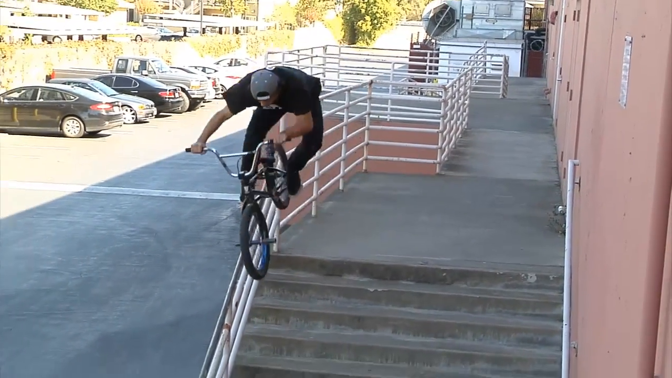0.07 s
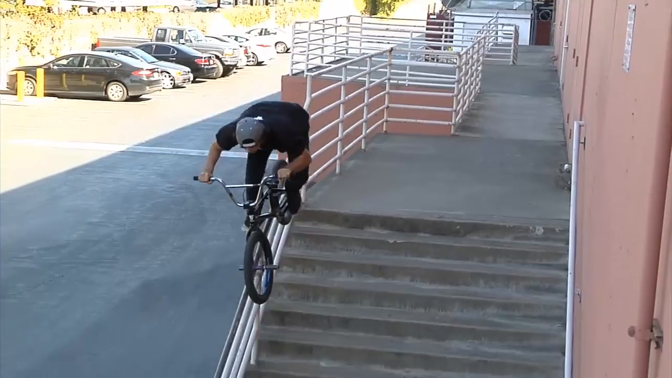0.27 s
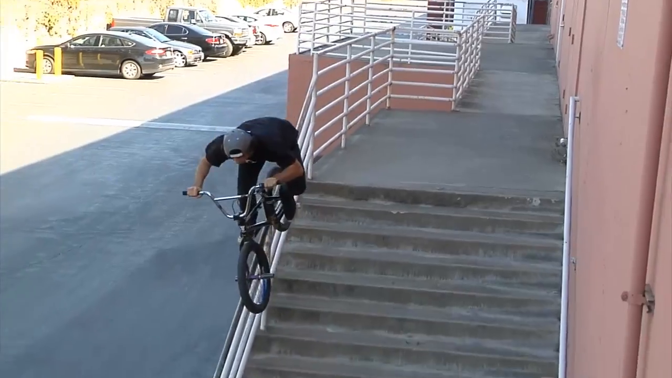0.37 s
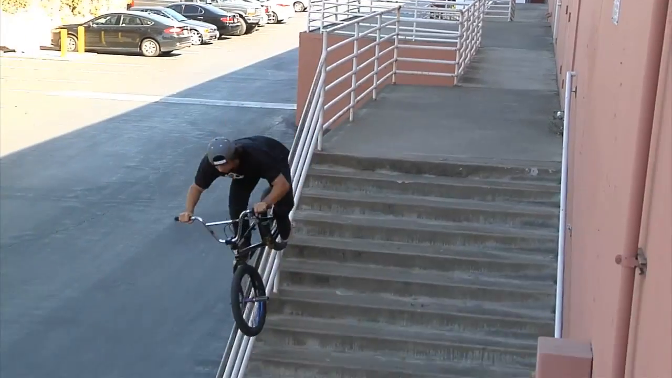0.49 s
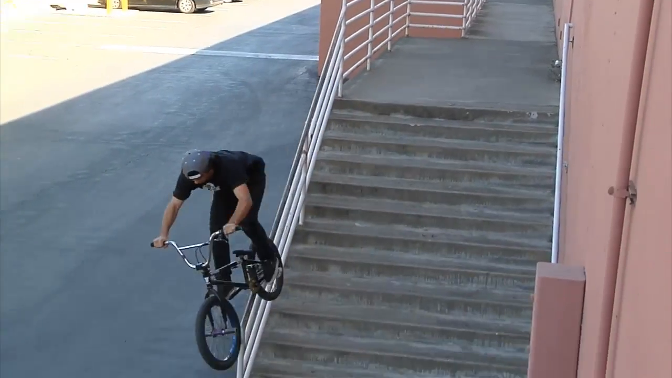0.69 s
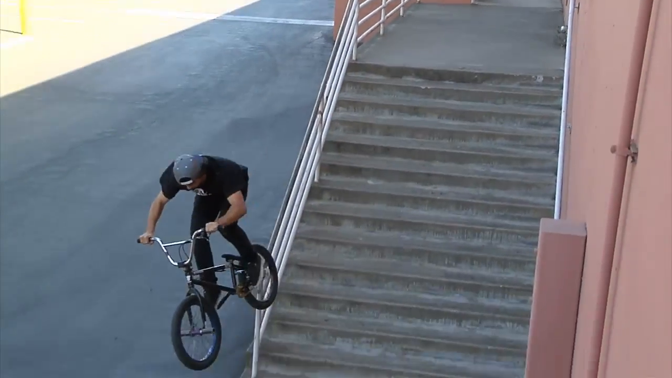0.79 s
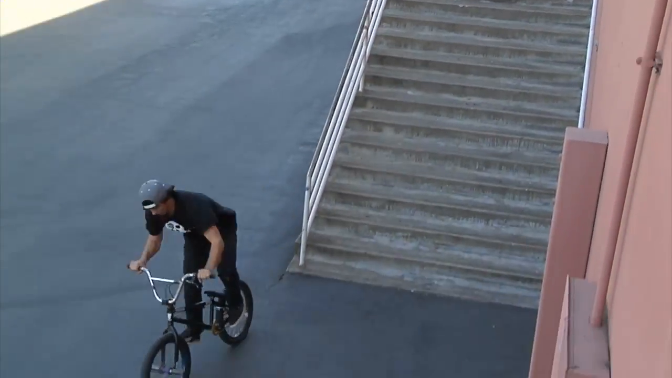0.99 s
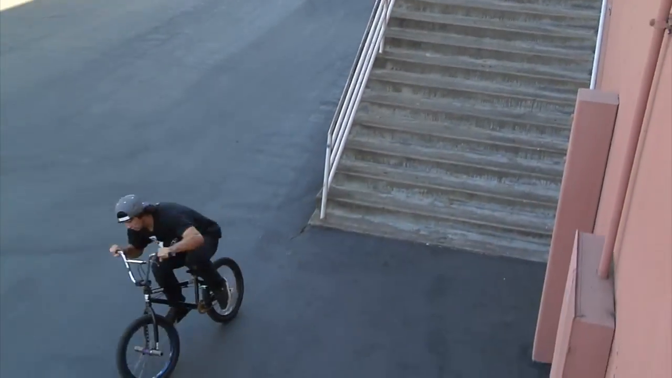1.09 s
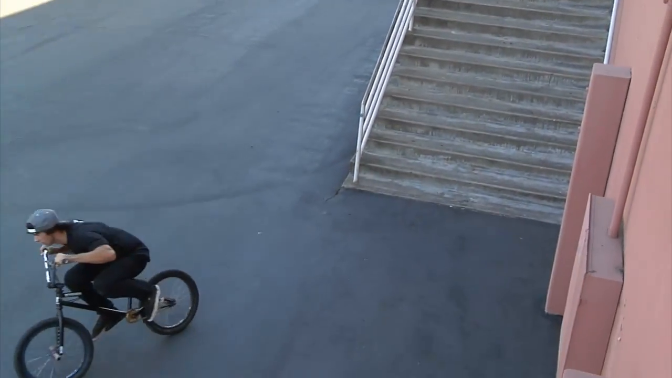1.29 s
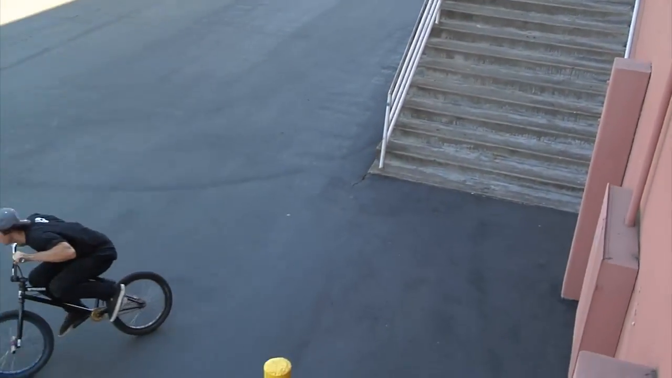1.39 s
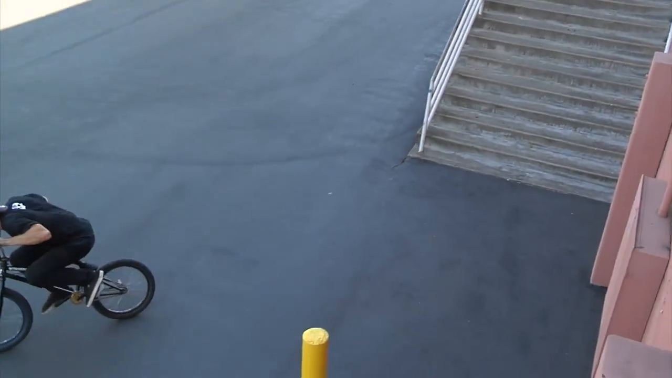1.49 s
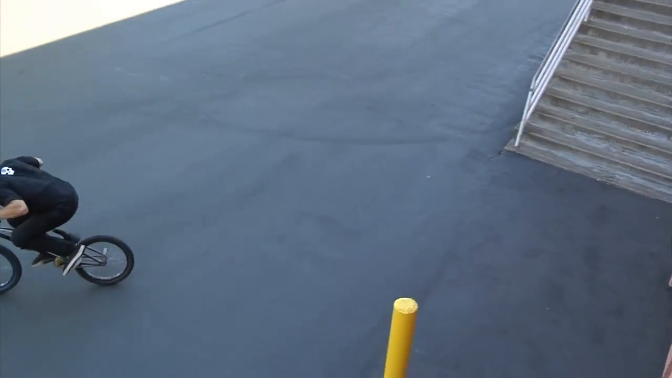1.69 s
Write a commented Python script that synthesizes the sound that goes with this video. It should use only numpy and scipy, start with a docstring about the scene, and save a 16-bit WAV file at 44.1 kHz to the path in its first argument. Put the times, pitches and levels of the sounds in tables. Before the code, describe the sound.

Ringing metal grind of a bicycle sliding down a stair rail, landing and rolling away.

```python
"""A bike's steel pegs slam onto a stair handrail, grind down it and clack off the end.
Stick-slip friction and knocks drive the rail's modes; the railing booms and rings on.
The tyres thump onto asphalt, chain and frame rattle, and the freewheel whirrs as the bike
rolls off. Walls reverberate; a low town hum lies underneath."""
import sys
import numpy as np
from scipy import signal
from scipy.fft import rfft, irfft
from scipy.io import wavfile
from scipy.ndimage import uniform_filter1d

SR = 44100
rng = np.random.default_rng(int(sys.argv[2]) if len(sys.argv) > 2 else 0)


def transcribe(u):
    """Save the signal u as a 16-bit wav file named by the first command-line argument.

    u: samples, shape (n,) or (channels, n), limited to [-1, 1]; the rate is SR.
    q: integer samples, one column per channel.
    """
    v = np.clip(np.atleast_2d(u).T, -1, 1)
    q = np.round(v * 32767).astype(np.int16)
    wavfile.write(sys.argv[1], SR, q)


N = 74970
T = np.arange(N) / SR
STEEL_RISE_S = 0.0004


def undb(db):
    return 10 ** (np.asarray(db) / 20)


def unit_rms(x):
    return x / np.sqrt(np.mean(x ** 2))


def butter(x, hz, kind, order=2):
    return signal.sosfilt(signal.butter(order, hz, kind, fs=SR, output="sos"), x)


def colour(x, spectrum):
    """Unit-energy minimum-phase filter from rows of freq_hz, gain_db."""
    freq_hz, gain_db = np.array(spectrum).T
    bins_hz = np.maximum(np.arange(2049) * SR / 4096, 1)
    cepstrum = irfft(np.interp(np.log(bins_hz), np.log(freq_hz), gain_db) * np.log(10) / 20)
    cepstrum[1:2048] *= 2
    cepstrum[2049:] = 0
    impulse = irfft(np.exp(rfft(cepstrum)))
    return signal.fftconvolve(x, impulse / np.sqrt(np.sum(impulse ** 2)))[:N]


def envelope(table, column):
    """Gain over time from a dB column, silent outside the table."""
    rows = np.array(table)
    return undb(np.interp(T, rows[:, 0], rows[:, column], left=-120, right=-120))


def wander(rate_hz):
    """Random steps at rate_hz, smoothed twice."""
    hold = int(SR / rate_hz)
    steps = np.repeat(rng.standard_normal(N // hold + 1), hold)
    return 1.143 * uniform_filter1d(uniform_filter1d(steps, hold), hold)[:N]


def stick_slip(slips_per_s=4000, spread_db=2):
    """Dense uneven friction clicks over a rubbing hiss."""
    slipping = rng.random(N) < slips_per_s / SR
    clicks = slipping * rng.standard_normal(N)
    clicks *= undb(spread_db * np.minimum(rng.exponential(size=N), 3.5))
    return unit_rms(unit_rms(clicks) + undb(-0.5) * rng.standard_normal(N))


def decay(start_s, level_db, t60_s, rise_s):
    """Impact envelope: fast rise, exponential fall."""
    age_s = np.maximum(T - start_s, 0)
    return undb(level_db - 60 * age_s / t60_s) * (1 - np.exp(-age_s / rise_s))


def struck_mode(hits, pitch_hz, t60_s, rise_s=STEEL_RISE_S):
    """One damped sine per hit."""
    return sum(decay(start_s, level_db, t60_s, rise_s) * np.sin(2 * np.pi * pitch_hz * (T - start_s))
               for start_s, level_db in hits)


def town_hum(level_db=-38):
    """Low town noise, drifting slightly in level."""
    # freq_hz, gain_db
    spectrum = [(30, -3.5), (90, -1), (250, -9.5), (400, -12), (649, -18), (1760, -34.5), (2290, -37.5),
                (16000, -60)]
    return unit_rms(colour(rng.standard_normal(N), spectrum)) * undb(level_db + 0.84 * wander(8.6))


def freewheel():
    """Freewheel and chain whirr: faint in the air, louder rolling away."""
    # time_s, level_db
    levels = [(0, -58.5), (1.09, -59), (1.106, -48.5), (1.282, -52.5), (1.45, -49.5), (1.7, -47.5)]
    # freq_hz, gain_db
    spectrum = [(710, -22), (1570, -25), (2130, -2), (3150, -2), (3380, 6), (3750, -4), (5070, -7),
                (7000, -4), (7730, -0.5), (8630, -9.5), (10100, -7), (11500, -14.5), (13100, -9),
                (16000, -14)]
    return undb(-2) * colour(stick_slip() * envelope(levels, 1) * undb(1.1 * wander(37.54)), spectrum)


def metal_knocks(landing_s=1.03):
    """Noisy blows of pegs, chain and frame. Returns their sound and their push on the rail until landing."""
    # start_s, level_db, bass_offset_db, treble_offset_db, t60_s
    knocks = [(0.2161, -25, -4, -25, 0.037), (0.2200, -20, -16, 8, 0.069), (0.2249, -16, -6, 7, 0.086),
              (.256, -19, -4, 10.5, 0.24), (0.412, -27.5, 10, 9, 0.044), (0.677, -28, -18, 20.5, 0.065),
              (0.862, -19.5, -16, 2.5, 0.11), (1.036, -13, -14, -15, 0.04), (1.0437, -11, -27, -17, 0.022),
              (1.049, -15.5, -14, 9.5, 0.093), (1.058, -23, -12, -18, 0.068), (1.073, -33, -13, 26, 0.034),
              (1.0944, -25, -25, 13, 0.071), (1.1392, -26, -1, 7, 0.19), (1.1735, -22.5, 1, 11, 0.026)]
    # freq_hz, gain_db
    spectrum = [(120, -31), (200, 9), (353, -4), (1400, -21.5), (1560, -17.5), (2290, -25), (3430, -23.5),
                (4350, -31), (7540, -27), (16000, -56.5)]
    gains = np.zeros((3, N))
    for start_s, level_db, bass_db, treble_db, t60_s in knocks:
        gains += decay(start_s, level_db, t60_s, STEEL_RISE_S) * undb([[bass_db], [0], [treble_db]])
    bass_gain, mid_gain, treble_gain = gains
    noise = stick_slip()
    bass, treble = butter(noise, 2000, "low"), butter(noise, 9500, "high")
    blows = bass * bass_gain + (noise - bass - treble) * mid_gain + treble * treble_gain
    return colour(blows, spectrum), noise * mid_gain * (T < landing_s)


def peg_slam():
    """The pegs land on the rail: two blows ring the steel."""
    # start_s, level_db
    hits = [(.2203, -13), (.2258, -21.5)]
    # pitch_hz, gain_db, t60_s
    modes = [(964.5, -6, 0.18), (1846, 3.5, 0.019), (2470, -7, 0.042), (3290, -4.5, 0.026)]
    return sum(undb(gain_db) * struck_mode(hits, pitch_hz, t60_s) for pitch_hz, gain_db, t60_s in modes)


def peg_grind():
    """Stick-slip in six bands shakes, scrapes and sizzles. Returns the sound and the drive on the rail."""
    # time_s, rumble_db, body_db, clatter_db
    shake_levels = [(0.221, -20, -24, -23.5), (0.319, -31, -28, -18), (0.459, -23.5, -25.5, -28.5),
                    (0.545, -44, -28, -24.5), (0.631, -29, -35, -24.5), (0.813, -33, -27, -29.5),
                    (0.859, -48, -28, -33.5), (0.903, -21.5, -46, -28.5), (1.015, -69, -64, -33),
                    (1.047, -39, -27, -27.5), (1.085, -28, -43, -32), (1.303, -33, -53, -40.5),
                    (1.327, -49.5, -41, -39), (1.409, -35.5, -45.5, -43), (1.7, -32, -43, -46.5)]  # outlasts the peg contact
    # time_s, low_scrape_db, high_scrape_db, sizzle_db
    grind_levels = [(0.221, -25, -36, -30), (0.227, -18.5, -27, -37.5), (0.241, -27.5, -31.5, -39.5),
                    (0.366, -26.5, -31.5, -39), (0.383, -35, -33, -45.5), (0.459, -26.5, -32, -40.5),
                    (0.465, -33, -33, -46), (0.559, -34, -29.5, -43.5), (0.611, -26.5, -25.5, -37.5),
                    (0.637, -22, -32, -37), (0.649, -35, -29, -41), (0.666, -30, -27, -35),
                    (0.782, -25, -25, -34.5), (0.857, -36, -45, -39), (0.863, -29.5, -36, -40),
                    (0.941, -39.5, -61, -53), (1.032, -41, -59, -67)]
    # each: freq_hz, gain_db
    rumble_spectrum = [(29, -55.5), (50, -10), (210, 4.5), (250, -5.5), (296, -0.5), (399, -5), (501, 10.5),
                       (768, -5), (912, -11), (1500, -11.5), (1950, -18), (3300, -120)]
    scrape_spectrum = [(530, -36.5), (900, -1.5), (1150, -9), (1220, -10), (1840, 0), (2060, -7.5),
                       (3210, -5), (4310, -18), (5800, -32.5), (7540, -29), (12800, -120)]
    sizzle_spectrum = [(3060, -29), (5200, -11), (5710, -25), (6250, -2.5), (6610, -3.5), (7900, -6),
                       (10900, -27.5), (13900, -27.5), (16000, -34)]
    # edges_hz, kind, drive_db
    bands = [(135, "low", 7), ((135, 400), "band", 4.5), ((400, 1150), "band", 2),
             ((1150, 2400), "band", 3), ((2400, 5000), "band", 5.5), (5000, "high", -21)]
    friction = [stick_slip() * envelope(levels, column) * undb(1.32 * wander(25.07))
                for levels in (shake_levels, grind_levels) for column in (1, 2, 3)]
    drives = [undb(drive_db) * butter(noise, edges_hz, kind)
              for noise, (edges_hz, kind, drive_db) in zip(friction, bands)]
    rumble, body = drives[:2]
    clatter, low_scrape, high_scrape, sizzle = friction[2:]
    shake = colour(rumble + body + butter(clatter, 400, "high"), rumble_spectrum)
    scrape = colour(butter(low_scrape, 2400, "low") + butter(high_scrape, 2400, "high"), scrape_spectrum)
    sound = undb(-1) * shake + undb(-0.5) * scrape + undb(-0.55) * colour(sizzle, sizzle_spectrum)
    return sound, sum(drives)


def rail_ring(drive):
    """Modes in beating pairs; coupling wanders with the contact point, pitch until the pegs leave."""
    # pitch_hz, gain_db, t60_s
    modes = [(299, -23.5, 0.73), (342, -17, 0.5), (492, -17, 0.47), (514.8, -14.5, 0.26),
             (558.3, -12.5, 0.13), (625, -14, 0.077), (653, -20, 0.068), (875, -13.5, 0.56),
             (957, -16.5, 0.41), (991, -15.5, 2.45), (1215, -12.5, 0.25), (1544, -14.5, 2.46),
             (1611, -17, 2.8), (1713, -11.5, 0.5), (1836, -9.5, 0.45), (1860, -9.5, 0.37),
             (2180, -11, 0.36), (3084, -16.5, 0.17), (3400, -12.5, 0.13), (6140, -20, .9),
             (6330, -11.5, 1.2), (6475, -22, 0.99), (6500, -17, 1.1)]
    pair_split, coupling_db, waver_hz, pegs_off_s = 0.003834, 4.5, 14.24, 0.9
    ring = 0
    for pitch_hz, gain_db, t60_s in modes:
        pole = np.exp(-np.log(1000) / (t60_s * SR))
        force = drive * undb(gain_db + coupling_db * wander(12.03))
        bend_hz = waver_hz * wander(15) * (T < pegs_off_s)
        for mode_hz in (pitch_hz * (1 - pair_split / 2), pitch_hz * (1 + pair_split / 2)):
            carrier = np.exp(2j * np.pi * np.cumsum(mode_hz + bend_hz) / SR)
            amplitude = signal.lfilter([1], [1, -pole], force / carrier)
            ring += np.sqrt(2 * (1 - pole)) * (carrier * amplitude).real
    return ring


def rail_boom(pitches_hz=(149.2, 212.8), waver_ratio=0.0183):
    """The railing's two lowest modes, wavering in pitch and level."""
    # time_s, first_mode_db, second_mode_db
    levels = [(0.221, -56, -35), (0.355, -58, -24.5), (0.393, -27, -38), (0.417, -32, -42.5),
              (0.521, -55, -24.5), (0.541, -38, -57.5), (0.645, -30.5, -26), (0.673, -47, -40),
              (0.735, -30, -40), (0.793, -33, -26), (0.849, -32, -51), (0.933, -37.5, -31.5),
              (1.051, -27.5, -37.5), (1.221, -44.5, -40.5), (1.287, -32.5, -38.5), (1.427, -33, -45.5),
              (1.509, -59, -42), (1.553, -37, -56), (1.591, -42.5, -39), (1.7, -39, -48.5)]
    boom = 0
    for column, pitch_hz in enumerate(pitches_hz, 1):
        gain = envelope(levels, column) * undb(1.84 * wander(30.52))
        phase = 2 * np.pi * np.cumsum(pitch_hz * (1 + waver_ratio * wander(30))) / SR
        boom += np.sqrt(2) * gain * np.sin(phase)
    return boom


def peg_clack():
    """A peg rings briefly as it clacks off the rail's end."""
    # start_s, level_db
    hits = [(.8615, -26), (.869, -22.5)]
    # pitch_hz, gain_db, t60_s
    modes = [(2480, -13, 0.043), (2970, 1.5, 0.03), (4190, -6.5, .04)]
    return sum(undb(gain_db) * struck_mode(hits, pitch_hz, t60_s) for pitch_hz, gain_db, t60_s in modes)


def tyre_thumps():
    """Tyres hit asphalt: one low, heavily damped mode."""
    # start_s, level_db
    hits = [(1.0428, -10), (1.0535, -27), (1.29, -26)]
    return -struck_mode(hits, pitch_hz=115.3, t60_s=0.065, rise_s=0.00067)


def wall_reverb(x, level_db=-11.5, t60_s=0.86, cutoff_hz=3150, delay_s=0.008):
    """Diffuse wall reflections: a dull, decaying noise tail."""
    tail = rng.standard_normal(SR) * undb(-60 * T[:SR] / t60_s) * (T[:SR] > delay_s)
    tail = butter(tail, cutoff_hz, "low", order=1)
    return undb(level_db) * signal.fftconvolve(x, tail / np.sqrt(np.sum(tail ** 2)))[:N]


def scene():
    """Mono mix; only the brighter metal sounds feed the reverb."""
    knocks, knock_drive = metal_knocks()
    whirr = freewheel()
    grind, grind_drive = peg_grind()
    ring = undb(-10) * rail_ring(grind_drive + undb(-3) * knock_drive)
    metal = whirr + knocks + peg_slam() + grind + ring + peg_clack()
    return (metal + wall_reverb(metal) + town_hum() + rail_boom() + tyre_thumps())[None, :]


def record(dry, low_hz=46, top_hz=15800):
    """Deep-bass roll-off and a steep top cut."""
    top_cut = signal.ellip(10, 0.2, 75, top_hz, fs=SR, output="sos")
    return signal.sosfilt(top_cut, butter(dry, low_hz, "high"))


dry = scene()
out = record(dry)
transcribe(out)
```